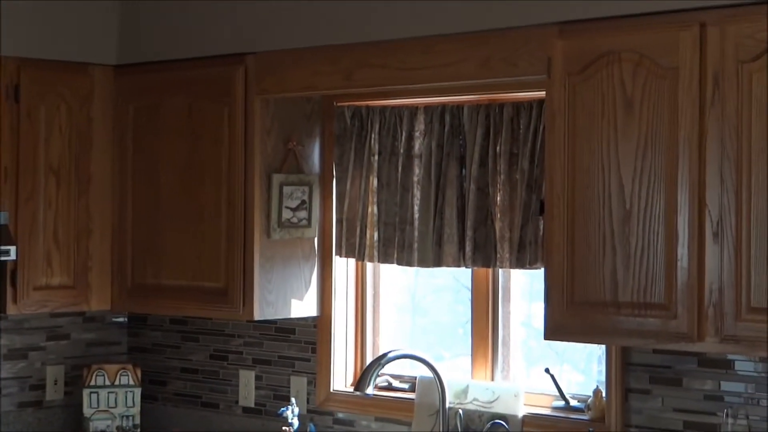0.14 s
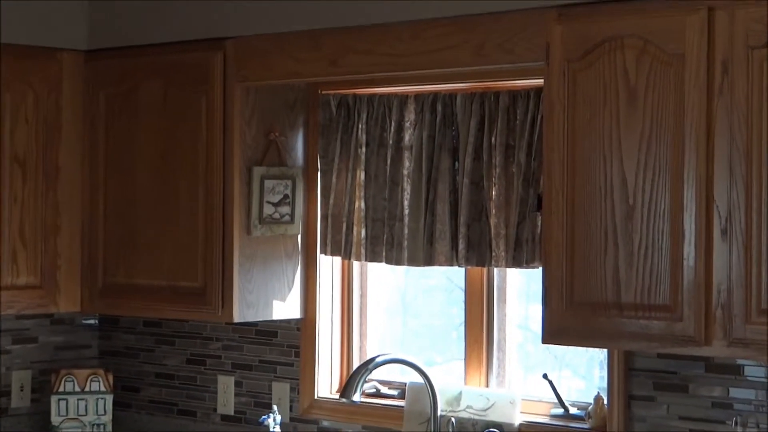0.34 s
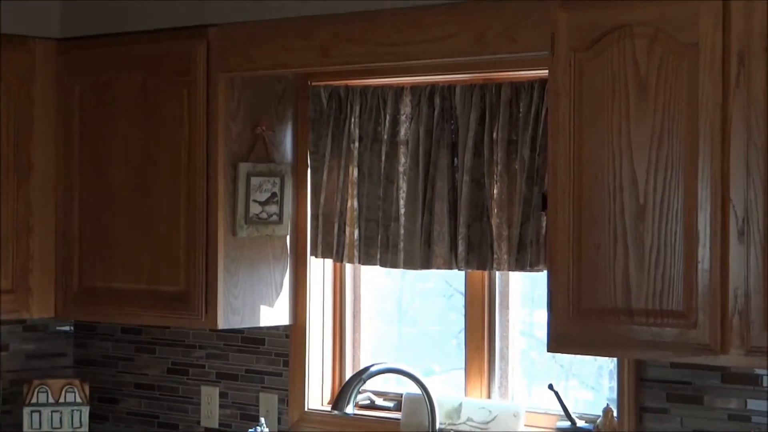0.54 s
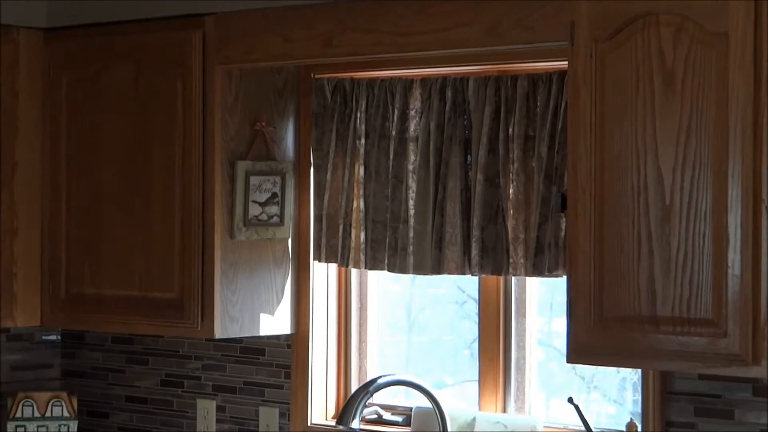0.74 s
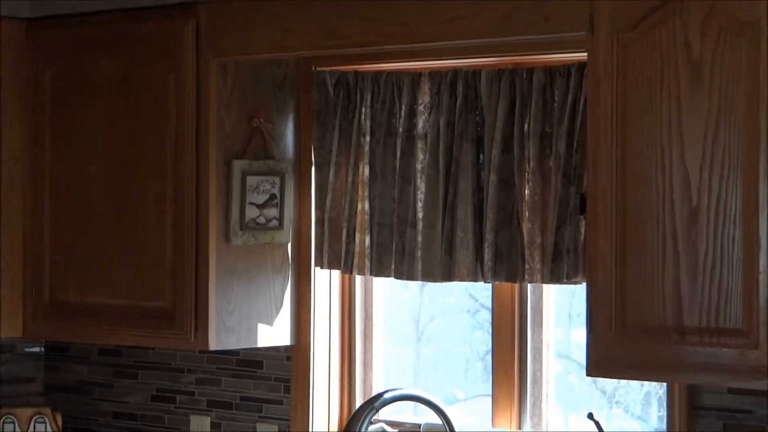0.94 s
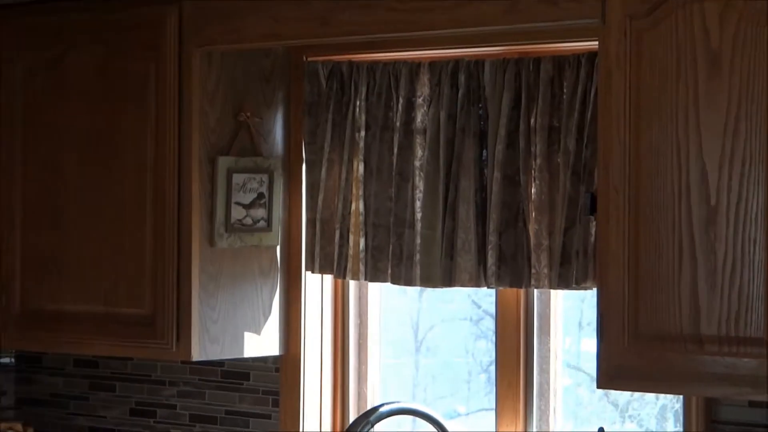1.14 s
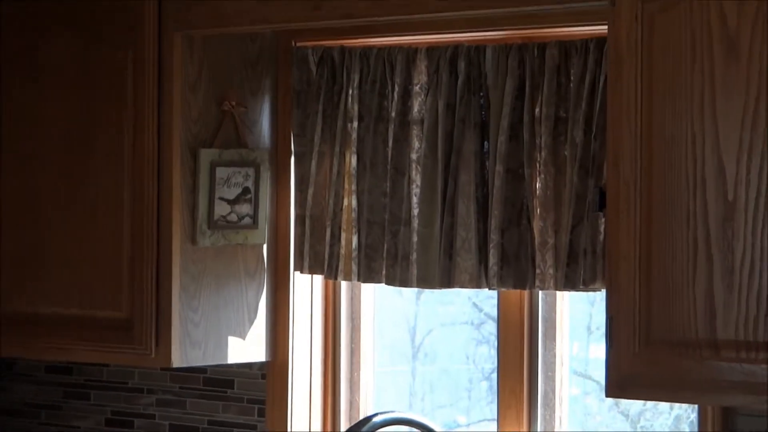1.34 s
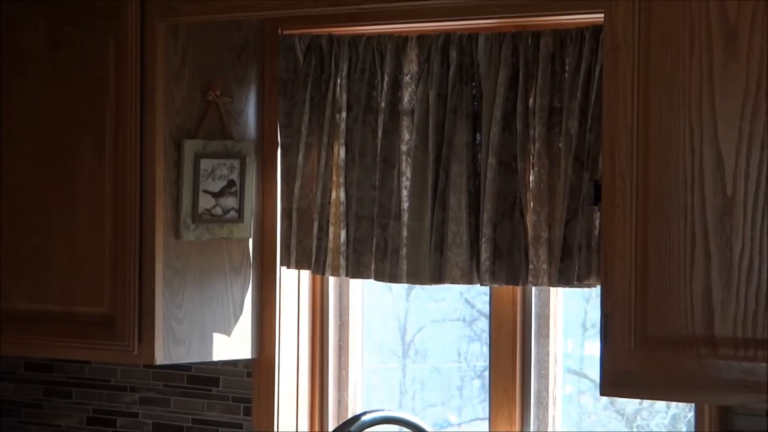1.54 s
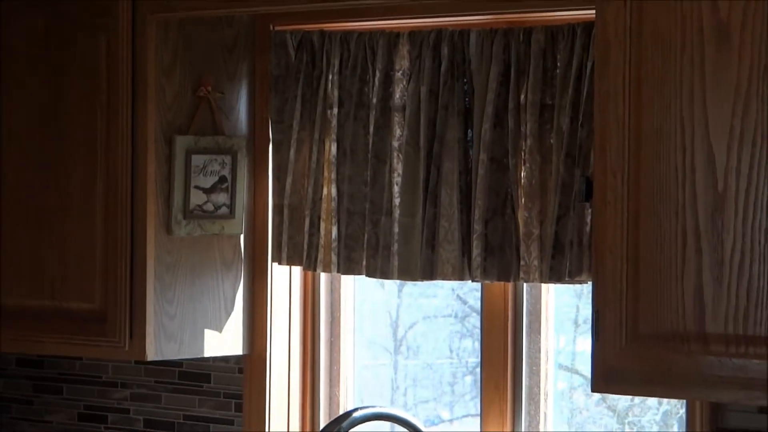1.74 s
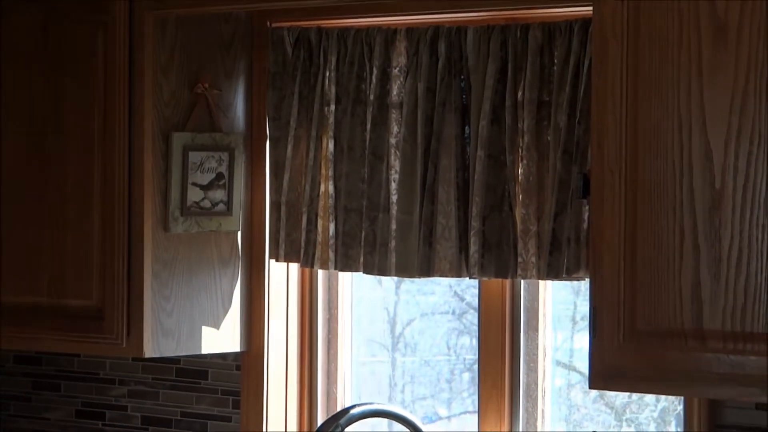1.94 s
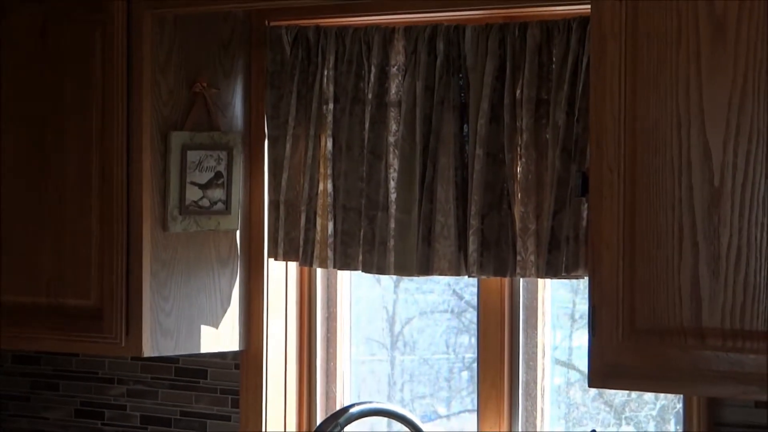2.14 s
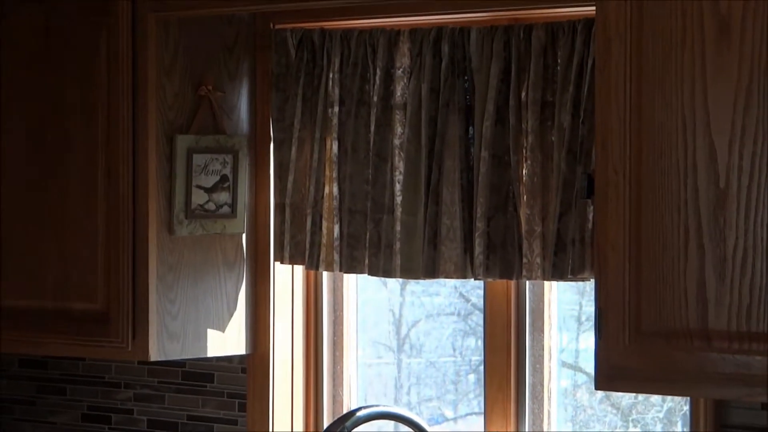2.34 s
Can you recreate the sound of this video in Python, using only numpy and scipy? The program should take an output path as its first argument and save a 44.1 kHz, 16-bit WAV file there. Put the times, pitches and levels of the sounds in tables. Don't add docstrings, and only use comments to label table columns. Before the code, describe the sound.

A camcorder zoom motor whirs with a thin high whine, then a sharp plastic click ends it.

```python
import sys
import numpy as np
from scipy import signal
from scipy.fft import rfft, irfft, next_fast_len
from scipy.io import wavfile
from scipy.ndimage import map_coordinates

SR = 44100
rng = np.random.default_rng(int(sys.argv[2]) if len(sys.argv) > 2 else 0)


def inscribe(sig):
    pcm = np.round(np.clip(np.atleast_2d(sig).T, -1, 1) * 32767)
    wavfile.write(sys.argv[1], SR, pcm.astype(np.int16))


def how_loud(loudness_db):
    steps = np.asarray(loudness_db, float) / 20
    return 10 ** steps


N = 109897

# frequency in Hz, level in dB.
BROAD = [(300, 3), (1000, -15), (2000, -13), (5500, -38), (9000, -13), (15000, -24.5)]
# frequency in Hz, side over middle in dB.
MOTOR_SIDE = [(60, -3), (130, 2), (290, -7), (640, -1), (1410, -6), (3100, -7.5), (6820, -14), (15000, -28)]
# frequency in Hz, side over middle in dB.
SNAP_SIDE = [(600, 3), (2000, -5), (5000, -11), (12000, -9)]


def unit(x):
    return x / np.sqrt(np.mean(x ** 2) + 1e-20)


def along(points, hz):
    f, value = np.transpose(points)
    return np.interp(np.log(hz + 1), np.log(f + 1), value)


def wobble(rate):
    return map_coordinates(rng.standard_normal(N // 100), [np.arange(N) * rate / SR])


def filtered(x, response):
    m = next_fast_len(N + 8192)
    hz = np.fft.rfftfreq(m, 1 / SR)
    return irfft(rfft(x, m) * response(hz), m)[..., :N]


def modes(table):
    def response(f):
        total = 0
        for k, (centre, width, db) in enumerate(table):
            drag = 1j * f * width
            total = total + (-1) ** k * how_loud(db) * drag / (centre * centre - f * f + drag)
        return total
    return response


def twice_through(hz, width, db=0):
    return lambda f: modes([(hz, width, db)])(f) ** 2


def spread(pair, side):
    s = filtered(pair[1], lambda hz: how_loud(along(side, hz)))
    return np.array([pair[0] + s, pair[0] - s])


def noise():
    return rng.standard_normal((2, N))


def shell(x):
    return filtered(x, lambda hz: (1j * hz / (475 + 1j * hz)) ** 4)


def motor():
    start_s, stop_s, coast_s = .040, 1.536, .012
    first_hz, cruise_hz, spinup_s = 100, 178.4, .1
    steps_per_turn, turn_db = 6, 1
    # time in seconds, rub level in dB, whine level in dB.
    screw_levels = [(0.05, -62, -56), (0.062, -54.5, -54), (0.174, -55.5, -46), (0.236, -58, -63),
                    (0.314, -52, -47), (0.352, -51.5, -61.5), (0.538, -51, -51.5), (0.58, -56, -53.5),
                    (0.772, -50, -51.5), (0.83, -54, -60), (1.248, -51, -52.5), (1.31, -56, -60),
                    (1.328, -47, -49.5), (1.336, -56, -59), (1.356, -53, -49), (1.402, -51.5, -63),
                    (1.526, -50, -58), (1.54, -58, -82)]
    t = np.arange(N) / SR
    age = np.clip(t - start_s, 0, None)
    step_rate = cruise_hz - (cruise_hz - first_hz) * np.exp(-age / spinup_s)
    steps = np.cumsum((t > start_s) * step_rate) / SR
    on = np.clip(age / 0.00081, 0, 1) * np.exp(-np.clip(t - stop_s, 0, None) / coast_s)
    turn = how_loud(turn_db * np.sin(2 * np.pi * steps / steps_per_turn))
    pulse = unit(np.exp(-3 * (steps % 1)))

    def gated(share):
        return turn * (share * pulse + 1 - share) * noise()

    s, rub_db, whine_db = np.transpose(screw_levels)
    rub_db, whine_db = np.interp(t, s, rub_db), np.interp(t, s, whine_db)
    grip_rub_db, grip_whine_db = squeaks(t)
    low = barrel(gated, turn, steps, t, age, rub_db)
    rub = screw_rub(gated, turn) * how_loud(rub_db + grip_rub_db)
    whine = screw_whine(gated, age) * how_loud(whine_db + grip_whine_db)
    high = (rub + whine) * np.clip((age - .01) / 0.0047, 0, 1)
    return spread(on * (low + high), MOTOR_SIDE)


def barrel(gated, turn, steps, t, age, rub_db):
    step_gate, step_db, rub_shakes = 0.17, -48, 0.2
    kick_db, kick_s = 0, 0.023
    # frequency in Hz, width in Hz, level in dB.
    barrel_modes = [(450, 38, -0.5), (655, 118, 4), (820, 51, 1), (1010, 74, 1.5), (1121, 100, -1.5),
                    (1230, 170, -17), (1404, 110, -5), (1660, 130, -12), (1970, 220, -14), (2675, 203, -6),
                    (3473, 220, -13.5), (3705, 190, -15.5), (4470, 106, -23.5)]
    push = gated(step_gate)
    ring = 0
    for mode in barrel_modes:
        ring = ring + filtered(push * binding(mode[0], t) * how_loud(0.6 * wobble(13)), modes([mode]))
    between = filtered(gated(0.2), lambda hz: how_loud(along(BROAD, hz)) * (hz < 6000))
    ring = shell(unit(ring + between)) * how_loud(step_db)
    tones = turn * (knocks(steps, t) + ridges(t))
    shake_db = rub_shakes * (rub_db - np.mean(rub_db)) + kick_db * np.exp(-age / kick_s)
    return (ring + tones) * how_loud(shake_db)


def knocks(steps, t):
    knock_hz, knock_db, scatter_db = 1699, -54.5, 2
    rise, fall = 0.068, 0.79
    draw = rng.standard_normal((2, 600, 3))[:, steps.astype(int)]
    part = steps % 1
    shape = (1 - np.exp(-part / rise)) * np.exp(-fall * part) * (1 - part) ** 0.38
    tone = np.sin(2 * np.pi * knock_hz * t + 9 * draw[..., 0] + 0.64 * part * draw[..., 1])
    return how_loud(knock_db) * unit(shape * tone * how_loud(scatter_db * draw[..., 2]))


def ridges(t):
    # frequency in Hz, pitch wander in Hz, level in dB.
    ridge_tones = [(647.6, 30, -63), (818, 34.7, -66), (1022.5, 35, -60), (1696, 60, -61)]
    out = 0
    for hz, wander, db in ridge_tones:
        pitch = [hz + wander * wobble(90), hz + wander * wobble(90)]
        tone = np.sin(2 * np.pi * np.cumsum(pitch, axis=1) / SR)
        out = out + how_loud(db + wobble(25.45)) * binding(hz, t) * tone
    return out


def binding(hz, t):
    # time in seconds, length in seconds, frequency in Hz, level change in dB.
    binds = [(.066, .012, 2700, 6), (.11, 0.012, 2700, 8), (.26, .03, 1020, 3), (0.305, 0.01, 2700, 7),
             (.33, .17, 1700, 2.5), (.337, .008, 2700, 5), (0.39, 0.11, 4100, 8), (.42, .025, 1020, -3),
             (0.422, 0.015, 2700, 7), (.48, .015, 2700, 3), (.51, .04, 1020, 2), (.53, .03, 4100, 4),
             (0.552, 0.015, 2700, 4.5), (.585, .01, 2700, 6), (.654, .012, 2700, 4), (0.797, .012, 2700, 7),
             (0.815, 0.022, 3700, 10), (.884, .015, 3700, 10), (0.905, 0.025, 1020, 5),
             (1.098, 0.038, 1130, 5.5), (1.27, .012, 2700, 5), (1.4, 0.15, 950, 4), (1.48, 0.07, 3700, 4),
             (1.508, 0.035, 1000, 3)]
    boost_db = 0
    for s, length, at, db in binds:
        if abs(np.log(hz / at)) < 1 / 6:
            boost_db = boost_db + db * np.exp(-((t - s) / length) ** 2)
    return how_loud(boost_db)


def screw_rub(gated, turn):
    rub_gate, rub_turn = 0.15, 1.7
    # frequency in Hz, width in Hz, level in dB.
    screw_modes = [(8060, 370, 3.5), (7950, 160, -9), (9140, 350, 4), (10300, 800, -44), (11760, 610, -4.5),
                   (12540, 560, 2.5), (14100, 650, -18)]
    roughness = how_loud(2.1 * wobble(70.1) + 1.54 * wobble(39.98))
    scrape = gated(rub_gate) * turn ** rub_turn * roughness
    rub = sum(filtered(scrape * how_loud(1.1 * wobble(14.3)), modes([mode])) for mode in screw_modes)
    between = filtered(scrape[:, ::-1], lambda hz: how_loud(along(BROAD, hz) + 14.5))
    return unit(filtered(rub + between, lambda hz: 1 / (1 + (5000 / (hz + 1)) ** 6)))


def screw_whine(gated, age):
    rise, rise_s = 0.13, 0.035
    # frequency in Hz, width in Hz, level in dB.
    whine_modes = [(7000, 290, 8), (6690, 1080, -2.5)]
    flutter = how_loud(1.6 * wobble(55))
    band = lambda hz: modes(whine_modes)(hz) / (1 + ((hz - 6800) / 1100) ** 4)
    sing = filtered(gated(0.22) * flutter, band)
    warp = np.arange(N) + rise * rise_s * SR * np.exp(-age / rise_s)
    return unit(np.array([map_coordinates(channel, [warp]) for channel in sing]))


def squeaks(t):
    # time in seconds, length in seconds, rub change in dB, whine change in dB.
    grips = [(.075, 0.017, 2.5, 3.5), (.09, .01, -2, -0.5), (0.109, .012, 0, -5), (0.153, 0.022, 2.5, 0),
             (0.202, .012, 4, -3.5), (.244, 0.0053, 0, 8), (0.395, 0.013, 1, 5), (0.47, 0.011, 4.5, -6),
             (.59, .015, 0, -3.5), (.626, 0.013, -3.5, -3), (.654, .012, 4, 2.5), (0.676, .008, 0, -4),
             (0.8, .008, 0, -5), (0.81, .008, 2, 4), (0.86, 0.023, 1.5, -2), (0.901, 0.013, 0, 7),
             (0.979, 0.017, -7, 2), (1.01, 0.011, 4.5, 2.5), (1.086, 0.046, 0.5, -2), (1.158, 0.018, 1, -3),
             (1.198, .02, 0.5, 3.5)]
    return sum(np.outer([rub, whine], np.exp(-((t - s) / length) ** 2)) for s, length, rub, whine in grips)


def rocker():
    snap_s, snap_db, snap_rise_s = 1.3265, -16, 0.00038
    slip_s, slip_db, crack_db = .0045, -18, -14
    # frequency in Hz, level in dB, time to fall 60 dB in seconds.
    rocker_tones = [(800, -9.5, 0.023), (959, -5, 0.017), (1367, -10.5, 0.034), (1920, -11, 0.0117),
                    (2274, -1, 0.012), (2430, -3, .009), (2970, -20, 0.0047), (4350, -5, 0.008),
                    (4610, -2, 0.0076), (5030, -5.5, 0.007), (14100, -14, .004)]
    t = np.arange(N) / SR - snap_s
    after = np.clip(t, 0, None)
    ring = np.zeros((2, N))
    for hz, db, t60 in rocker_tones:
        for channel, lag in enumerate((np.pi / 2, 0)):
            ring[channel] += how_loud(db - 60 * after / t60) * np.sin(2 * np.pi * hz * after + lag)
    crack = unit(filtered(noise(), modes([(2400, 3200, 3), (4700, 1800, -7), (14500, 2500, 1)])))
    crack = how_loud(crack_db - 60 * after / 0.0066) * crack
    thin = unit(filtered(noise(), twice_through(4900, 1300)))
    thick = unit(filtered(noise(), twice_through(2000, 1700, 1)))
    growth = np.exp(np.clip(t, None, 0) / slip_s)
    slip = how_loud(slip_db) * (how_loud(-7) * thin + 1.4 * thick * growth) * (t > -2 * slip_s) * (t < 0)
    snap = (ring + crack) * (1 - np.exp(-after / snap_rise_s))
    return spread(how_loud(snap_db) * (snap + slip), SNAP_SIDE)


def fingers():
    # time in seconds, peak in dB, frequency in Hz, time to fall 60 dB in seconds,
    # left over right in dB.
    ticks = [(0.0414, -37.5, 1083, 0.037, 7), (0.0514, -39.5, 1700, 0.013, 10), (.066, -46, 520, .05, 0),
             (1.560, -54, 3750, 0.02, .5), (1.561, -53, 2500, 0.016, -3), (1.709, -51, 590, 0.051, 5),
             (1.716, -50.5, 8050, .025, -2), (1.717, -56, 4900, .04, -2), (2.1326, -32, 2740, 0.013, -7),
             (2.135, -46, 2480, .015, -5), (2.148, -48, 650, .015, 0), (2.1806, -45, 2700, .012, -5),
             (2.1808, -32.5, 1230, 0.016, -7), (2.182, -51, 198, 0.22, -3), (2.183, -45, 287, 0.041, -3),
             (2.1843, -38, 1450, 0.011, -14), (2.4075, -48, 1300, .015, -2), (2.4078, -43.5, 620, 0.03, -2),
             (2.4265, -43, 750, .012, -2), (2.434, -51, 3800, .015, 0), (2.44, -48, 1250, .015, 0)]
    # time in seconds, length in seconds, level in dB, centre in Hz, width in Hz.
    slides = [
        (.068, .022, -51, 480, 500),
        (1.715, .04, -67, 8000, 600),
        (2.136, .095, -58.5, 4350, 1000),
        (2.165, .1, -67, 8600, 1200),
        (2.168, .07, -60, 11000, 7000),
        (2.175, .07, -58, 1800, 2600),
        (2.401, .07, -58, 900, 1200),
        (2.411, .05, -61, 8200, 4500),
    ]
    # time in seconds, peak in dB, centre in Hz, width in Hz,
    # time to fall 60 dB in seconds.
    cracks = [
        (2.1322, -45, 11400, 8000, 0.01),
        (2.1785, -51, 4200, 1300, 0.035),
        (2.1805, -49, 1500, 2000, .03),
        (2.4075, -43.5, 7300, 3500, 0.007),
        (2.43, -58, 1100, 1200, 0.06),
    ]
    out, t = np.zeros((2, N)), np.arange(N) / SR
    for s, db, hz, t60, pan_db in ticks:
        age = np.clip(t - s, 0, None)
        tone = (1 - np.exp(-age / 0.00066)) * np.sin(2 * np.pi * hz * age)
        out += how_loud(db - 60 * age / t60) * tone * how_loud([[pan_db / 2], [-pan_db / 2]])
    for s, length, db, hz, width in slides:
        u = np.clip((t - s) / length, 0, 1)
        rub = unit(filtered(noise() * how_loud(2.5 * wobble(250)), twice_through(hz, width)))
        out += spread(how_loud(db) * rub * np.minimum(8 * u, 1) * np.sqrt(1 - u), MOTOR_SIDE)
    for s, db, hz, width, t60 in cracks:
        burst = unit(filtered(noise(), twice_through(hz, width)))
        fade = how_loud(db - 60 * np.clip(t - s, 0, None) / t60) * (t > s)
        out += spread(fade * burst, SNAP_SIDE)
    return out


def room():
    air_db, hiss_db, line_hz, line_db = -61, -59.5, 12000, -73.5
    # frequency in Hz, level in dB per Hz.
    air_colour = [(15, -55), (25, -24), (92, -11), (127, -9), (295, -5.5), (484, -6.5), (615, -5.5),
                  (824, -7), (1500, -7), (1950, -40), (3300, -120)]
    # frequency in Hz, level in dB per Hz.
    hiss_colour = [(880, -64), (1500, -3.5), (1670, -2), (5300, -7.5), (11500, -9.5), (12300, -11),
                   (15900, -15.5)]
    # frequency in Hz, width in Hz, level in dB.
    drone = [(100.9, 3.7, -82), (475, 25, -69), (801, 40, -67)]
    # frequency in Hz, side over middle in dB.
    room_side = [(30, -7), (60, -15), (130, -7), (290, -2.5), (640, -2), (1410, 1.5), (3100, -2.5),
                 (6820, -7), (15000, -16.5)]
    air = unit(filtered(noise(), lambda hz: how_loud(along(air_colour, hz))))
    air = how_loud(air_db + 0.74 * wobble(6.0)) * air
    hiss = how_loud(hiss_db) * unit(filtered(noise(), lambda hz: how_loud(along(hiss_colour, hz))))
    hum = sum(how_loud(db) * unit(filtered(noise(), modes([(hz, width, 0)]))) for hz, width, db in drone)
    line = how_loud(line_db + wobble(20)) * np.sin(2 * np.pi * line_hz * np.arange(N) / SR)
    return spread(air + hiss + hum, room_side) + line


def scene():
    touch = filtered(fingers(), lambda hz: (1j * hz / (110 + 1j * hz)) ** 2)
    return motor() + shell(rocker()) + touch + room()


def low_pass(x):
    return signal.sosfilt(signal.butter(12, 15850, fs=SR, output="sos"), x)


def record(dry):
    mix = filtered(dry, lambda hz: hz < 15830)
    return low_pass(mix)


dry = scene()
out = record(dry)
inscribe(out)
```